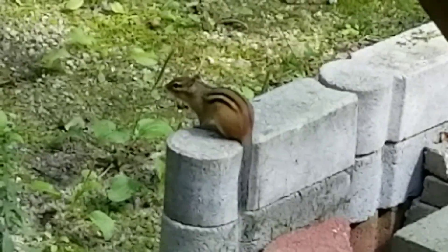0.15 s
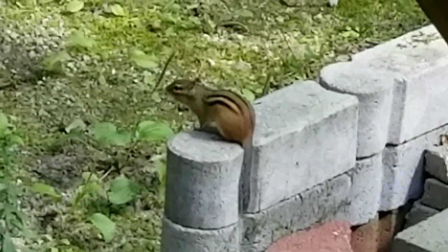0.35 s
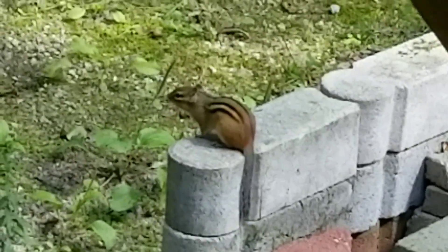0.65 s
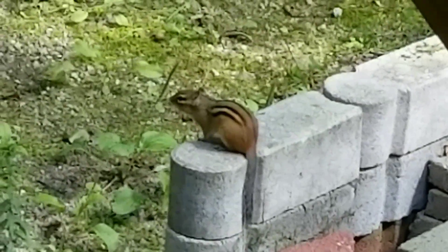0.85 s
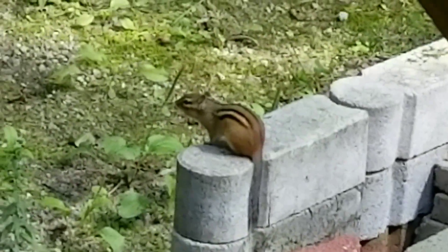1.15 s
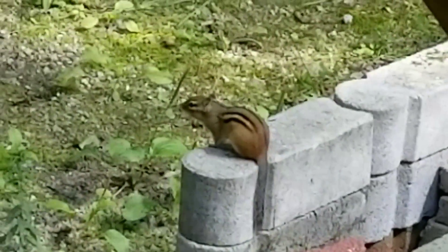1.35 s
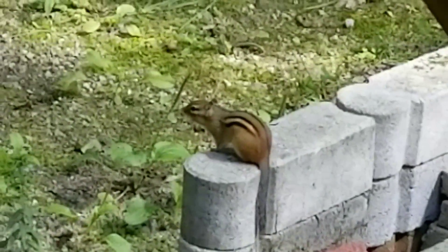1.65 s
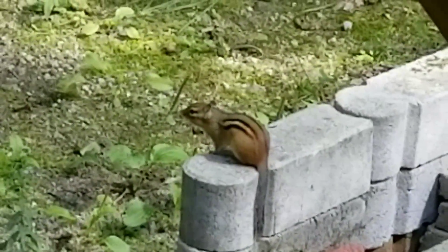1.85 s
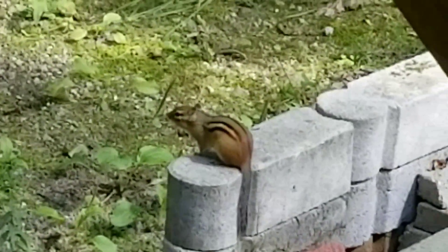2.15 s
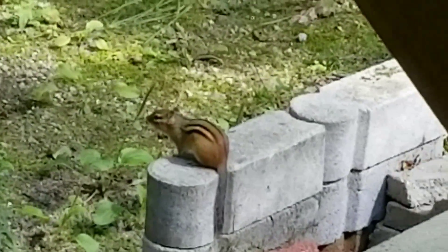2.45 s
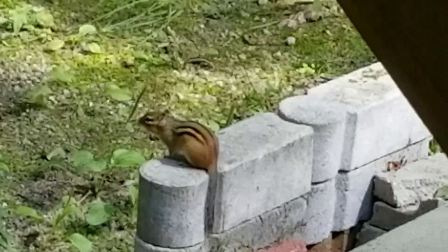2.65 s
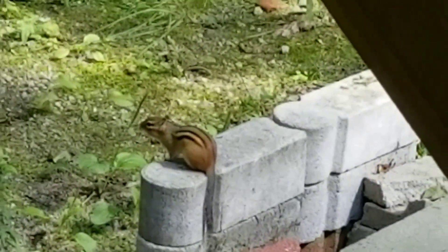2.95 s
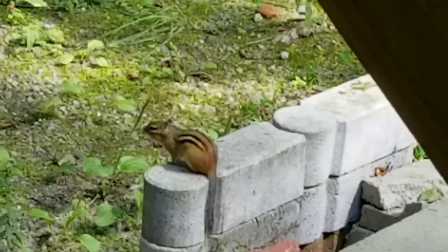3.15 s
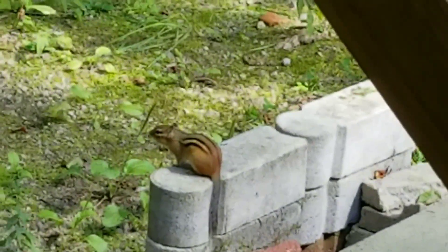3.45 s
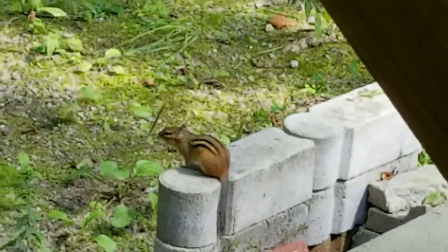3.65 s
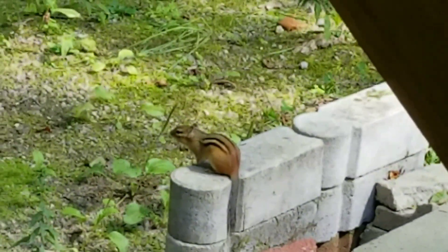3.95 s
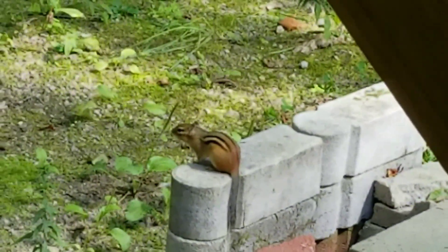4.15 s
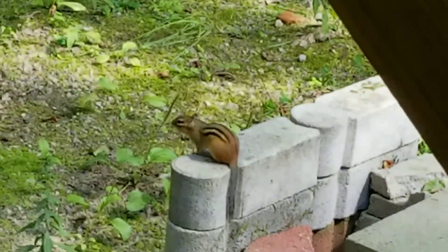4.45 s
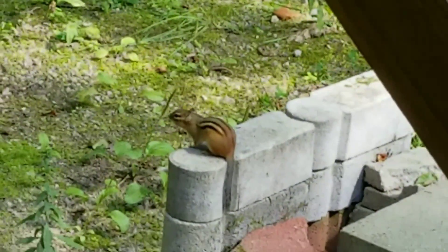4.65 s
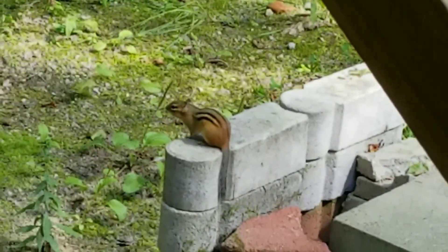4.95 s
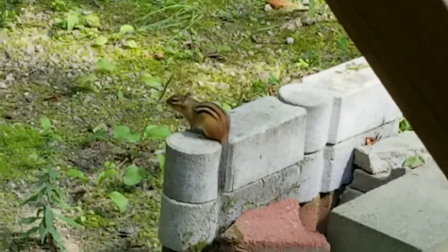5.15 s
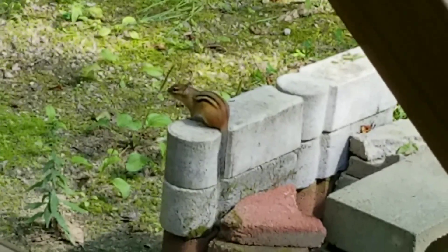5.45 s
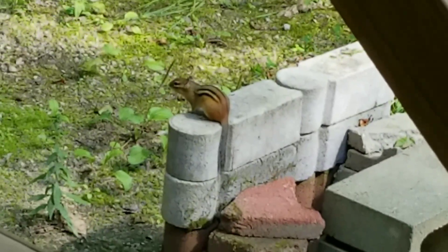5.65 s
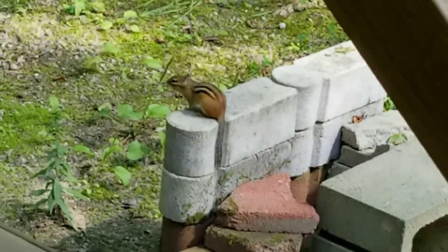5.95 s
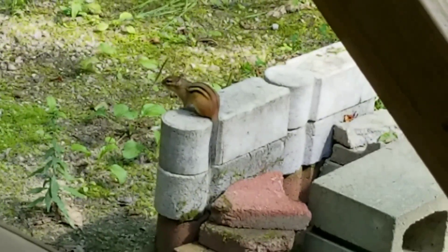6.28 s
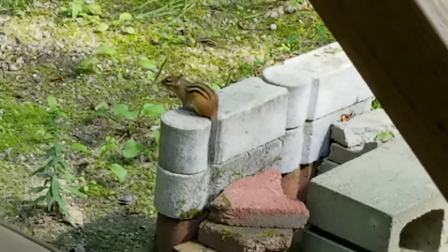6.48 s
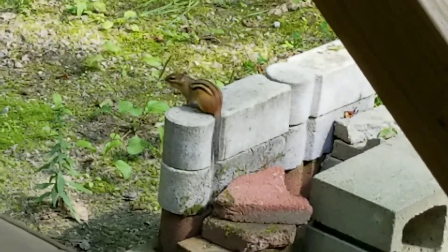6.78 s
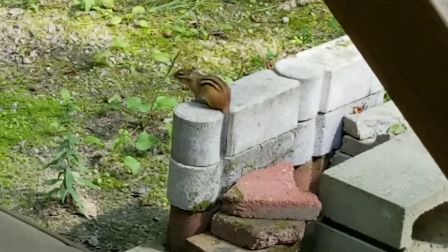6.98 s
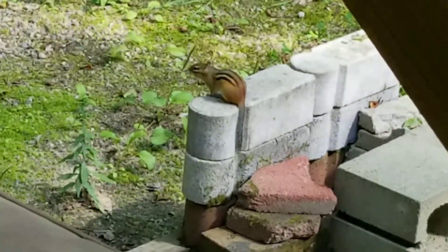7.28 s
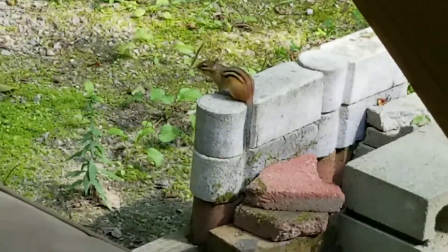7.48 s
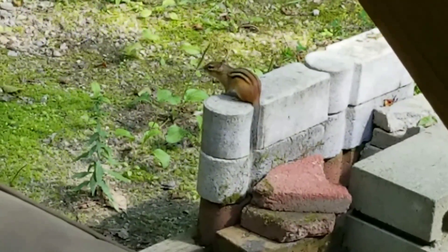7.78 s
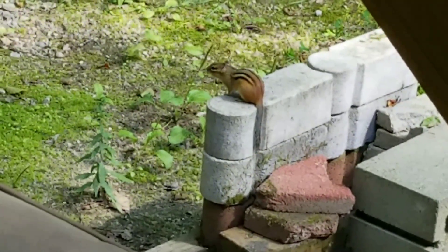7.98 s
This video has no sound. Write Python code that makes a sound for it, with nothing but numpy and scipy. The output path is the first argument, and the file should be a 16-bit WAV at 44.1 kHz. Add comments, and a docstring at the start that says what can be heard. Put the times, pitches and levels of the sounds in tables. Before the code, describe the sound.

Piercing chipmunk chirps repeat steadily, a little over two a second, with a short outdoor echo and faint far traffic behind.

```python
"""Sharp, steady chips ring through a yard: a chipmunk on a low wall, a few metres from a wooden porch.
Each chip is one whistle that plunges through three octaves in 40 ms. Posts, porch and house wall
reflect it, and the yard reverberates. Behind it a distant machine hums over quiet outdoor air and far
traffic, with faint swelling tones, a far bird, a soft thud, a scuff and a faint rustle."""
import sys
import numpy as np
from scipy import signal
from scipy.fft import rfft, irfft, next_fast_len
from scipy.io import wavfile
from scipy.ndimage import map_coordinates

SR = 44100
rng = np.random.default_rng(int(sys.argv[2]) if len(sys.argv) > 2 else 0)


def file_out(sig):
    """Save sig as 16-bit WAV at sys.argv[1]."""
    # one column per channel
    cols = np.atleast_2d(sig).T
    # limit, then scale
    lim = np.clip(cols, -1, 1)
    pcm = np.round(lim * 32767).astype(np.int16)
    wavfile.write(sys.argv[1], SR, pcm)


N = 358091


def amp(db):
    """Amplitude ratio: tenfold for every 20 dB."""
    return 10 ** (np.asarray(db) / 20)


def along(points, hz):
    """Interpolation of (frequency_hz, value) points on a logarithmic frequency axis."""
    frequencies, values = np.transpose(points)
    return np.interp(np.log(hz + 1), np.log(frequencies), values)


def curve(rows):
    """Linear interpolation of (time_s, value) rows at every sample."""
    return np.interp(np.arange(N) / SR, *np.transpose(rows))


def wobble(rate_hz):
    """Slow random modulation: a spline through rate_hz Gaussian knots a second."""
    knots = rng.standard_normal(int(N * rate_hz / SR) + 4)
    fine = np.arange(0, len(knots) - 1, 1 / 10)
    return np.interp(np.arange(N) * rate_hz / SR, fine, map_coordinates(knots, [fine]))


def burst(peak_s, attack_s, t60_s):
    """Exponential growth and decay: up 60 dB in attack_s to reach 1, then down 60 dB in t60_s."""
    t = np.arange(N) / SR - peak_s
    return amp(-60 * np.maximum(-t / attack_s, t / t60_s))


def filtered(x, response):
    """Linear filtering: the spectrum is multiplied by a frequency response."""
    size = next_fast_len(N + SR // 2)
    return irfft(rfft(x, size) * response(np.fft.rfftfreq(size, 1 / SR)), size)[..., :N]


def rush(colour, side_db):
    """Stereo noise of rms 1, shaped by (frequency_hz, gain_db); long waves reach both ears alike."""
    mid, side = filtered(rng.standard_normal((2, N)), lambda hz: amp(along(colour, hz)))
    side = amp(side_db) * filtered(side, lambda hz: hz / (hz + 300))
    ears = np.array([mid + side, mid - side])
    return ears / np.sqrt(np.mean(ears ** 2) + 1e-20)


def tone(hz, drift_hz):
    """Random frequency modulation: a slightly unsteady sine of rms 1."""
    cycles = np.cumsum(hz + drift_hz * wobble(5)) / SR + rng.random()
    return np.sqrt(2) * np.sin(2 * np.pi * cycles)


def add(track, sound, start_s):
    """Superposition: a sound sums into the track from start_s on."""
    start = round(start_s * SR)
    part = sound[:, max(-start, 0):max(N - start, 0)]
    track[:, max(start, 0):max(start, 0) + part.shape[1]] += part


# Spectrum of outdoor air: frequency_hz, relative_density_db
AIR_SPECTRUM = [(20, -10.5), (45, -4), (90, -0.5), (140, -4), (220, -12), (450, -17), (750, -22),
                (1300, -26.5), (1750, -22), (2200, -28), (3000, -33), (6000, -33.5), (16000, -38.5)]
def air():
    """Ambient noise: quiet outdoor air, its power densest at low frequencies."""
    return amp(-63 + 1.2 * wobble(23)) * rush(AIR_SPECTRUM, side_db=-12.5)


# Contour of the road's rush, before it is widened and lowered: time_s, level_db
TRAFFIC_CONTOUR = [(0.0, -67.5), (1.4, -67), (1.76, -71.5), (3.21, -66.5), (3.39, -68), (5.99, -70.5),
                   (8.12, -69)]
def traffic():
    """Amplitude-modulated noise: the low-middle rush of a distant road, ebbing in the second half."""
    contour_db = curve(TRAFFIC_CONTOUR)
    swing_db = 1.44 * (contour_db - contour_db.mean())
    level_db = contour_db.mean() + swing_db - 2
    colour = [(120, -13), (200, -13.5), (300, 0), (450, 2.5), (620, -2.5), (900, -18.5), (1500, -46.5)]
    return amp(level_db + 1.8 * wobble(9.6)) * rush(colour, side_db=-21.5)


# Strength of the machine's lowest tone: time_s, level_db
DRONE_LEVELS = [(0.0, -64.5), (0.27, -54.5), (1.04, -66.5), (1.7, -58), (1.74, -67.5), (1.99, -55),
                (4.45, -64), (5.02, -54), (5.22, -58), (6.85, -59), (6.9, -71), (7.05, -62), (7.1, -71),
                (7.55, -58), (7.71, -69), (7.76, -58), (8.07, -64), (8.12, -67)]
# The machine's upper tones: pitch_hz, level_db
WHINE_PARTIALS = [(118.4, -66.5), (479, -82), (646, -80), (877.5, -81), (1147, -83.5), (1464, -83),
                  (1637, -83), (1696, -79.5), (1814, -88.5), (1933, -86.5)]
def machine():
    """A line spectrum: a far motor's wavering low drone under thin, nearly steady partials."""
    drone = amp(curve(DRONE_LEVELS) + 1.4 * wobble(5)) * tone(hz=58.3, drift_hz=0.952)
    whine = sum(amp(db + 1.5 * wobble(4)) * tone(hz, drift_hz=1.1) for hz, db in WHINE_PARTIALS)
    return drone + whine


# Far tones that come and go: peak_s, length_s, pitch_hz, level_db
TONE_SWELLS = [(.17, 0.55, 430, -69.5), (0.933, 0.38, 432, -64.5), (1.284, 0.74, 430, -71),
               (2.495, 0.67, 432, -72.5), (3.048, 0.64, 431, -65), (4.33, .5, 434, -71.5),
               (7.2, 2.7, 141.3, -69.5)]
def far_tones():
    """Amplitude envelopes: faint, nearly pure tones swell and fade along raised cosines."""
    t = np.arange(N) / SR
    arch = lambda s, length: np.cos(np.pi * np.clip((t - s) / length, -.5, .5)) ** 2
    return sum(amp(db) * arch(s, length) * tone(hz, drift_hz=2.15) for s, length, hz, db in TONE_SWELLS)


# A far bird's notes: start_s, length_s, pitch_hz, half_width_hz (to 60 dB down), level_db
BIRD_NOTES = [(1.42, .28, 4050, 1400, -75), (7.4, .45, 3100, 2400, -79)]
def bird():
    """Narrow-band noise: thin notes, blurred by distance into bands of sound."""
    notes = 0
    for s, length, hz, width, db in BIRD_NOTES:
        swell = curve([(s, 0), (s + length / 2, 1), (s + length, 0)])
        band = [(abs(hz - width), -60), (hz, 0), (hz + width, -60)]
        notes = notes + amp(db) * swell * rush(band, side_db=-28)
    return notes


def rustle():
    """Randomly modulated noise: a faint airy swell that flickers near the end."""
    colour = [(400, -31), (800, -2.5), (1300, -4.5), (2000, -16), (3300, -7.5), (4500, -32.5)]
    swell = burst(peak_s=7.9, attack_s=3, t60_s=6)
    return amp(-69.5 + 3 * wobble(10)) * swell * rush(colour, side_db=-5.5)


def thud():
    """A damped transient: one soft pulse of low noise."""
    colour = [(40, -31), (90, 8), (140, -15), (250, -17), (800, -62)]
    return amp(-42.5) * burst(peak_s=1.995, attack_s=.025, t60_s=0.077) * rush(colour, side_db=-22)


def scuff():
    """Friction noise: a brief soft scrape close by, roughened by fast amplitude modulation."""
    colour = [(200, -23), (500, -3.5), (850, 3), (1400, -4), (3200, -18), (5000, -54)]
    stroke = amp(-61) * burst(peak_s=4.025, attack_s=.035, t60_s=.5)
    return stroke * amp(3.3 * wobble(90)) * rush(colour, side_db=-8.5)


def diffuse_tail(t60s, build_s, side_db, scatter_hz):
    """Reverberation: echoes build, then decay at each frequency's rate; long waves scatter less."""
    size = SR * 3 // 4
    mid, side = rng.standard_normal((2, size))
    ears = np.array([mid + amp(side_db) * side, mid - amp(side_db) * side])
    hz, t, spectra = signal.stft(ears, SR, nperseg=128)
    scattering = (hz ** 2 / (hz ** 2 + scatter_hz ** 2 + 1)) ** .5 + .15
    decay = amp(-60 * t / along(t60s, hz)[:, None])
    ring = signal.istft(spectra * scattering[:, None] * decay, SR, nperseg=128)[1][:, :size]
    ring *= 1 - np.exp(-(np.arange(size) / SR / build_s) ** 2)
    return ring / np.linalg.norm(ring[0])


# Reverberation time of the yard: frequency_hz, t60_s
YARD_DECAY = [(1000, 1), (4500, 0.72), (7500, 0.66), (9500, 0.72), (14000, 0.45)]
def yard_reverberation():
    """A diffuse field: the yard's weak echoes gather slowly and ring longest at low frequencies."""
    return amp(-18) * diffuse_tail(YARD_DECAY, build_s=0.052, side_db=-16.5, scatter_hz=2400)


# Reverberation time of the porch: frequency_hz, t60_s
PORCH_DECAY = [(1000, 0.61), (4500, 0.17), (8000, 0.18), (14000, 0.14)]
def porch_scatter():
    """Scattering: posts and rails return a quick, dense rattle of echoes, short waves best."""
    return amp(-3) * diffuse_tail(PORCH_DECAY, build_s=.002, side_db=-14.5, scatter_hz=6200)


# Reflections from nearby posts and rails: delay_ms, gain_db
POST_ECHOES = [(.8, -12), (2.35, -11), (2.75, -10), (4.1, -5.5), (9.5, -8), (13.1, -10.5)]
POST_CUTOFF_HZ = 6000  # longer waves diffract around the posts
WALL_DELAY_MS, WALL_DB, WALL_CUTOFF_HZ = 17.3, -12.5, 2180
def sound_paths(steady_porch):
    """Multipath propagation: the impulse response of direct sound, porch, yard, posts and house wall."""
    paths = steady_porch + porch_scatter()  # part of the porch's echo differs from chip to chip
    paths += yard_reverberation()
    paths[:, 0] += 1  # direct sound
    posts, wall = np.zeros_like(paths), np.zeros_like(paths)
    for ms, db in POST_ECHOES:
        delay_ms = abs(ms + 0.054 * rng.standard_normal() + .004 * rng.standard_normal(2))  # per ear
        posts[[0, 1], np.round(delay_ms * SR / 1e3).astype(int)] += amp(db)
    wall[:, round(WALL_DELAY_MS * SR / 1e3)] = amp(WALL_DB)
    highpass = lambda x, hz: signal.lfilter(*signal.butter(2, hz, "high", fs=SR), x)
    return paths + highpass(posts, POST_CUTOFF_HZ) + highpass(wall, WALL_CUTOFF_HZ)


# Moments are counted from the chip's middle.
OPEN_MS, PEAK_MS, SHUT_MS, ARCH_DB_PER_MS = -7.5, 7.66, 10.397, 0.89
ATTACK_MS, RELEASE_MS = 1, 0.73
THIN_DB, THIN_END_MS = -34, 17.2
BLIP_MS, BLIP_DB, BLIP_FADE_DB_PER_MS = 21.8, -21.5, 1.7
def chip_envelope(ms):
    """The amplitude envelope of a chip: thin lead-in, quick attack, arch, abrupt release, closing blip."""
    step = lambda at_ms, edge_ms: (1 + np.tanh((ms - at_ms) / edge_ms / 2)) / 2
    arch = amp(-ARCH_DB_PER_MS * abs(ms - PEAK_MS))
    voice = step(OPEN_MS, ATTACK_MS) * (1 - step(SHUT_MS, RELEASE_MS)) * arch
    thin = amp(THIN_DB) * (1 - step(THIN_END_MS, RELEASE_MS))
    blip = step(BLIP_MS, ATTACK_MS) * amp(BLIP_DB - BLIP_FADE_DB_PER_MS * np.maximum(ms - BLIP_MS, 0))
    return (voice + thin + blip) * signal.windows.tukey(len(ms), .1)


# The whistle's plunge: time_from_middle_ms, pitch_hz
PITCH_GLIDE = [(-18, 9000), (-7.5, 8450), (-2, 7000), (2, 5150), (7.6, 4520), (11, 3650), (15.5, 2400),
               (20.5, 1290), (33, 860)]
# The throat's response to the fundamental, favouring two bands: frequency_hz, gain_db
THROAT_RESPONSE = [(3000, -2.5), (3700, -1), (4650, -1.7), (5800, -1.5), (7400, 1.14), (8500, 5.5),
                   (9500, -1.5)]
# The mouth's response to the overtones: frequency_hz, gain_db
MOUTH_RESPONSE = [(2000, -9), (5000, -27.5), (7000, 13), (8000, -10), (9500, -25), (11400, -28.5),
                  (12400, -15), (13500, -8.5), (15500, -13), (19000, -89.5)]
def chip(start_hz, third_harmonic_db, flutter_depth):
    """Source and filter: three harmonics of a plunging whistle sweep through throat and mouth bands."""
    glide_ms, glide_hz = np.transpose(PITCH_GLIDE)
    ms = np.arange(glide_ms[0], glide_ms[-1], 1e3 / SR)
    onset_shift_hz = (start_hz - glide_hz[0]) * np.interp(ms, [-14, -5], [1, 0])
    flutter = np.interp(ms, np.linspace(glide_ms[0], glide_ms[-1], 64), rng.standard_normal(64))
    detune = 0.00892 * rng.standard_normal()
    hz = (np.interp(ms, glide_ms, glide_hz) + onset_shift_hz) * (1 + detune + flutter_depth * flutter)
    phase = 2 * np.pi * np.cumsum(hz) / SR
    fundamental = amp(along(THROAT_RESPONSE, hz)) * np.sin(phase)
    overtone = lambda order: amp(along(MOUTH_RESPONSE, order * hz)) * np.sin(order * phase)
    return chip_envelope(ms) * (fundamental + overtone(2) + amp(third_harmonic_db) * overtone(3))


# The chipmunk's calls: middle_s, start_pitch_hz
CHIP_CALLS = [(-0.021, 9200), (0.3943, 9930), (0.8002, 9350), (1.2012, 8950), (1.6547, 9350), (2.072, 9840),
              (2.521, 9300), (2.9579, 8950), (3.3797, 9300), (3.793, 8950), (4.244, 9300), (4.6851, 9250),
              (5.1242, 8900), (5.5185, 8850), (5.9360, 8850), (6.3761, 9300), (6.7893, 9300),
              (7.2487, 8900), (7.7335, 8900)]
def chipmunk():
    """Convolution: each chip takes every path; a level difference draws the sound slightly left."""
    track = np.zeros((2, N))
    steady_porch = porch_scatter()
    for middle_s, start_hz in CHIP_CALLS:
        call = amp(-21) * chip(start_hz, third_harmonic_db=-4, flutter_depth=0.019)
        echoing = signal.fftconvolve(call[None], sound_paths(steady_porch), axes=1)
        add(track, echoing, start_s=middle_s + PITCH_GLIDE[0][0] / 1e3)
    left_over_right_db = curve([(0, 0.35), (8, 2.3)])
    return track * amp(np.array([left_over_right_db, -left_over_right_db]) / 2)


def scene():
    """Superposition: the pressures of all sources in the yard add."""
    return chipmunk() + machine() + far_tones() + air() + traffic() + scuff() + rustle() + bird() + thud()


def record(dry):
    """Band limiting: a very steep low-pass removes the highest treble."""
    cutoff_hz = 15780
    return filtered(dry, lambda hz: 1 / np.sqrt(1 + (hz / cutoff_hz) ** 240))


dry = scene()
out = record(dry)
file_out(out)
```